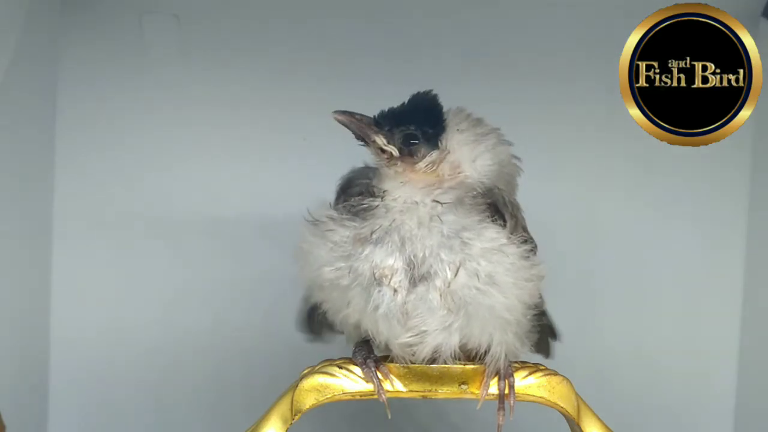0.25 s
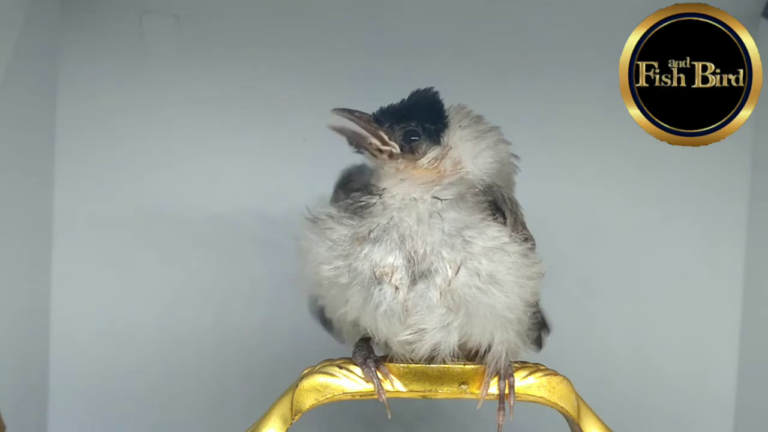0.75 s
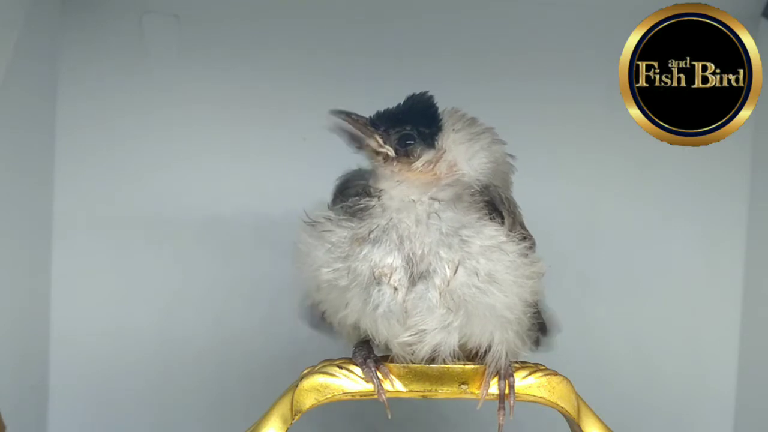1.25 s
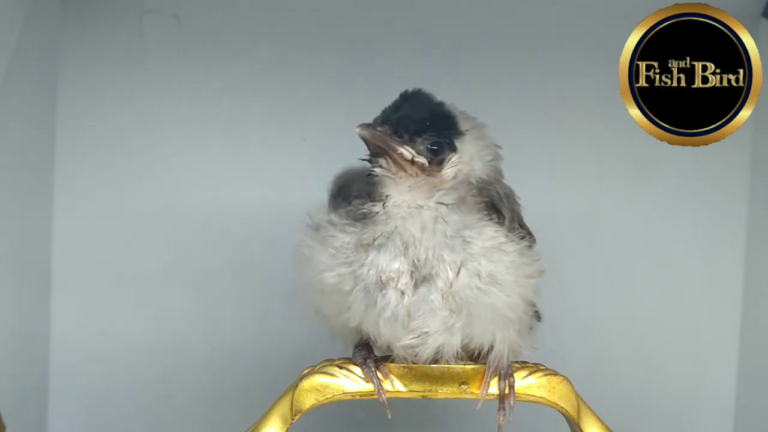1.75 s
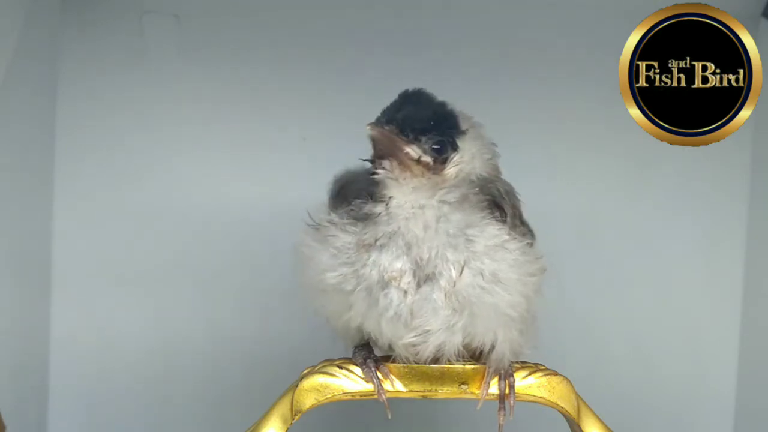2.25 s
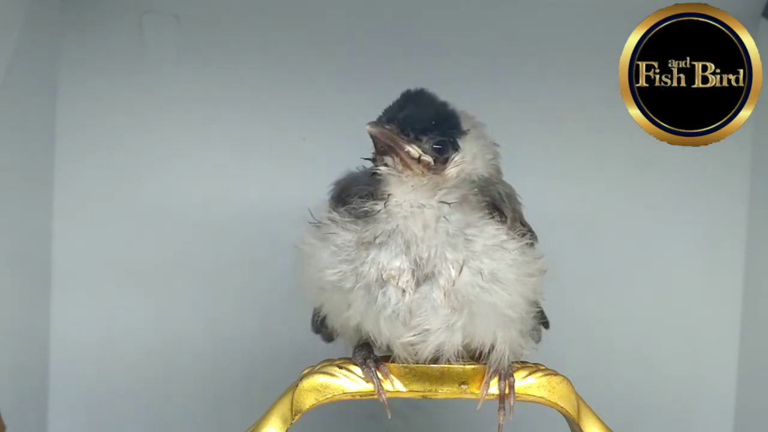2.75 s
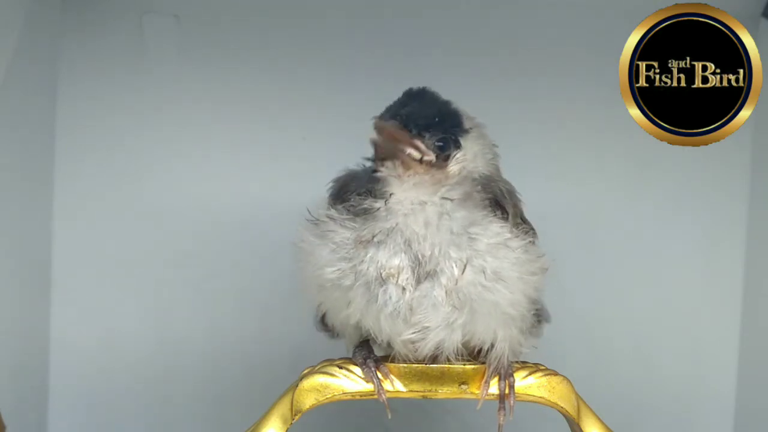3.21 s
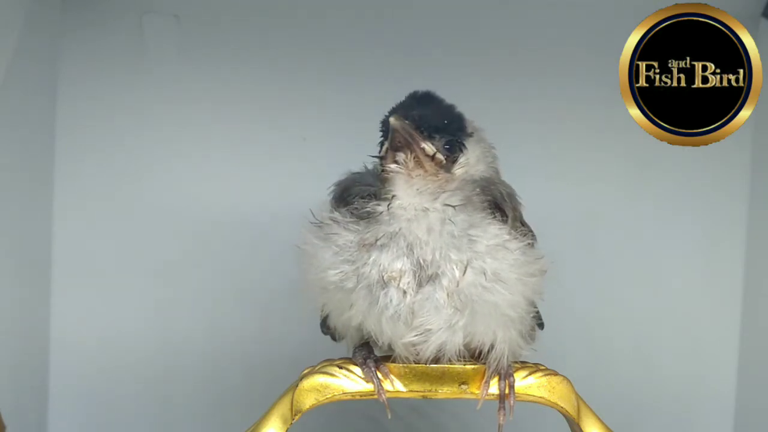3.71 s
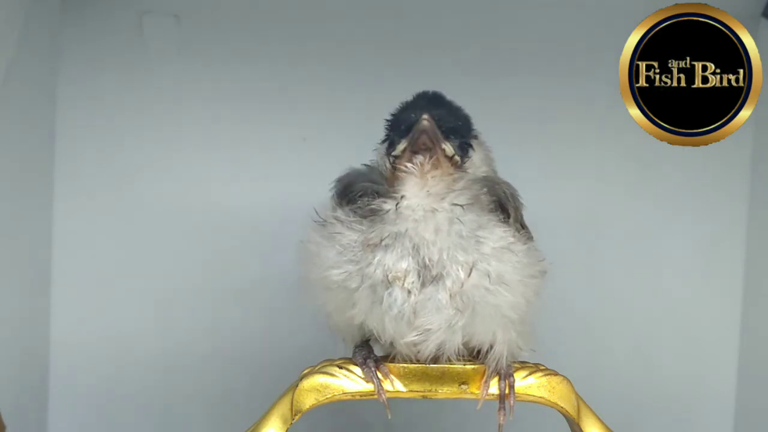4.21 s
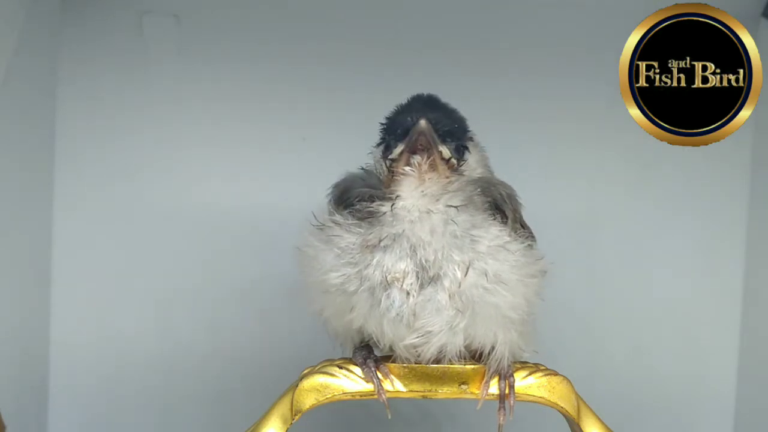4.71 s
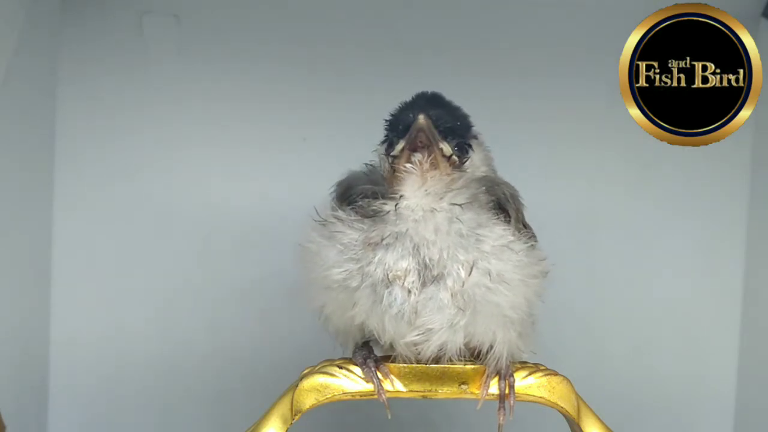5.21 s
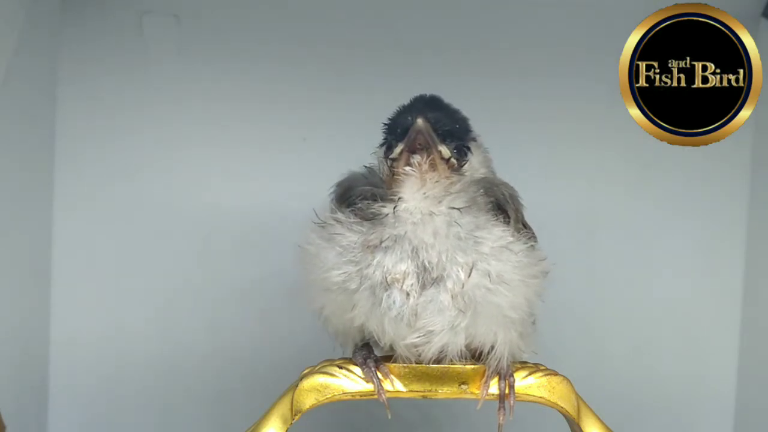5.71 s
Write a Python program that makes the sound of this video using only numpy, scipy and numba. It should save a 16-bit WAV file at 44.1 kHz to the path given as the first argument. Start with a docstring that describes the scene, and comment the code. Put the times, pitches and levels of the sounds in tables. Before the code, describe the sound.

Short, shrill chirps from a fledgling sound near the microphone, with a little room echo. Three come evenly, then the calls bunch up: a brief trilled squeak, a louder chirp and another squeak. Three slower chirps finish the series. Every call has a scratchy start, and the chirps dip slightly in pitch. The indoor background is quiet, with soft air noise, a low hum and a few very faint peeps.

```python
"""A small bare room: a fledgling begs near a stereo microphone, in seven falling chirps and two squeaks.
Each call opens with a short whistle and a rasp before the voice locks into a harmonic series.
Beak resonances filter the chirps; throat resonances filter the rough, trilled squeaks.
The room reverberates over a low hum, flickering air noise, one low whoosh and faint peeps."""
import sys
import numpy as np
from scipy import signal
from scipy.fft import rfft, irfft, next_fast_len
from scipy.io import wavfile
from scipy.ndimage import uniform_filter1d
from numba import njit

SR = 44100
rng = np.random.default_rng(int(sys.argv[2]) if len(sys.argv) > 2 else 0)


def materialize(psi):
    """Save the field psi as 16-bit PCM at rate SR to the path in sys.argv[1].

    A 1-D psi becomes a single channel; in a 2-D psi each row is a channel.
    """
    bounded = np.clip(np.atleast_2d(psi).T, -1, 1)
    quanta = np.round(bounded * 32767).astype(np.int16)
    wavfile.write(sys.argv[1], SR, quanta)


N = 262836
T = np.arange(N) / SR

# Spectrum of the room air: frequency_hz, relative_density_db
AIR_SPECTRUM = [(25, -30.5), (74, -18), (137, -28.5), (400, -34.5), (900, -32), (1560, -40.5), (2980, -42),
                (6000, -54.5), (15900, -56.5)]
# Whoosh envelope: time_s, level_db
WHOOSH_ENVELOPE = [(1.76, -71), (1.8, -48), (2.05, -49), (2.2, -61), (2.45, -67.5), (2.55, -93)]
# Whoosh bands: centre_hz, width_hz, gain_db
WHOOSH_SPECTRUM = [(366, 65, -3), (490, 200, -10), (606, 87, 2)]
# Faint peeps and swells: start_s, length_s, centre_hz, width_hz, level_db
PEEP_EVENTS = [(0.551, 0.19, 3104, 80.9, -61.5), (3.008, 0.11, 9020, 80, -66.5),
               (3.851, 0.22, 3166, 80, -64), (4.921, 0.05, 3170, 79.7, -71), (1.407, 0.22, 492, 403, -60),
               (2.68, 0.11, 867, 119, -66.5), (2.877, 0.66, 882, 198, -63.5),
               (3.44, 0.39, 1353, 101.6, -61.5), (3.508, 0.22, 897, 302, -63),
               (4.601, 0.14, 860, 400, -59.5), (4.646, 0.19, 302.6, 150, -64),
               (4.888, 0.19, 554, 99.8, -66), (5.604, 0.31, 326, 200, -77.5)]
# Reverberation by band: frequency_hz, t60_s, gain_db
ROOM_DECAY = [(1400, 0.48, -3), (3300, 0.5, 0.5), (6300, 0.44, -1.5), (9200, 0.38, 1), (14000, .33, 0)]
# Microphone port response, per head pose: frequency_hz, left_minus_right_db, left_lead_rad
PORT_RESPONSES = [
    [(1590, -5.5, 0.1), (3050, 0.5, -2.3), (3250, -6, -0.8), (3800, -8, 0.34), (4700, -11, 2.64),
     (5400, 4.5, 1.3), (5680, 1, -2.5), (6300, 2.5, -1.57), (6420, -2, 0.47), (6560, -1.0, 0.66),
     (7500, 4.5, -1), (8100, 2.5, -0.93), (9200, 3, -1.97), (9650, 3.5, -0.3), (9500, 6.5, 2),
     (10900, -5, -0.05), (13000, -4.5, 1.44)],
    [(1590, 2.5, 0.33), (3020, 2, 1.97), (3160, -4, -0.08), (3700, -6, 0.94), (4740, -9, 0.47),
     (5300, 3.0, 0.1), (6140, -8.5, -2.06), (6750, -5.0, 1.1), (6420, -2.5, 2.1), (6620, -8.5, 0.07),
     (7300, -2.5, 2), (7820, 0.5, 3.5), (8850, 6, 8.5), (9550, 7.0, 6.5), (9700, 9.0, 8.5),
     (11040, -12.5, 8.5), (13200, 2, 8)],
    [(1590, -4, -0.76), (3100, 6.5, 1.38), (3230, 4.5, 2.07), (3800, -4, -0.5), (4700, 2.5, 1.22),
     (5600, 4.5, -3.14), (6130, -15.5, 0.96), (6374, -4.5, 1.84), (6380, -7.5, -0.1), (6520, -7.5, -0.95),
     (7300, -0.5, -0.3), (7770, 1, -0.48), (9200, 14.5, -1.41), (9360, 3, 0.4), (9200, 19, 0.33),
     (11100, -10.5, -2.5), (13000, 0, -5.5)],
]
# Call openings: start_s, whistle_decay_s, whistle_db, rasp_peak_s, rasp_db
CALL_OPENINGS = [(-.008, 0.023, -21, .008, -9), (0.6946, 0.033, -22, .714, -12.5),
                 (1.288, 0.016, -26.5, 1.308, -12), (1.608, 0.0044, -18, 1.628, -17),
                 (2.167, 0.014, -22.5, 2.188, -13), (2.428, 0.006, -17.5, 2.447, -12.5),
                 (3.1965, 0.032, -20.5, 3.218, -12.5), (4.077, 0.017, -18, 4.095, -15),
                 (5.009, 0.017, -20.5, 5.03, -14.5)]
# Rasp bands: centre_hz, width_hz, gain_db
RASP_SPECTRUM = [(800, 400, -20), (2200, 1800, -19), (5216, 2800, 0.5), (6500, 3300, -9.5),
                 (10100, 2300, -6.5), (12100, 3500, -23)]
# Contour of each squeak: time_s, pitch_hz, level_db
SQUEAK_CONTOURS = [
    [(1.618, 1236, -32), (1.628, 1263, -14.5), (1.653, 1180, -7.5), (1.659, 1555, -4), (1.695, 1572, -5.5),
     (1.706, 1600, -15), (1.714, 1540, -36)],
    [(2.438, 1137, -35.5), (2.45, 1205, -26.5), (2.46, 1386, -9), (2.472, 1429, -5), (2.481, 1561, -5),
     (2.518, 1570, -7), (2.534, 1520, -27)],
]
# Trill of each squeak: start_s, build_s, swing_hz, crest_time_s, rate_hz
SQUEAK_TRILLS = [(1.653, 0.0047, 300, 1.683, 85.04), (2.461, .04, 323.2, 2.504, 85.87)]
# Effect of a full trill on partials 1 to 8: gain_db
TRILL_PARTIAL_DB = [-7, -4.5, -7, 0.5, -6, -2, -13, -10.5]
# Throat resonances: centre_hz, width_hz, gain_db
THROAT_MODES = [(3560, 1200, -4.5), (6430, 1500, -4.5), (6850, 1800, -6.5), (9670, 900, -7.5),
                (12400, 3000, -18)]
# Contour of each chirp: time_s, pitch_hz, effort_db
CHIRP_CONTOURS = [
    [(.017, 1648, 1.5), (.035, 1621, 5.5), (.055, 1626, 3), (.075, 1589, -2.5), (.092, 1528, 5),
     (.11, 1589, -1.5), (.133, 1548, 0.5), (.14, 1454, 4), (.148, 1441, -3)],
    [(.722, 1684, 3.5), (.74, 1646, 1.5), (.762, 1588, 1), (.79, 1607, 2), (.808, 1565, -3.5),
     (.82, 1502, 1), (.85, 1537, 3), (.862, 1530, 0), (.88, 1474, 0)],
    [(1.315, 1689, 0), (1.33, 1639, 1.5), (1.343, 1565, 1.5), (1.365, 1590, 0.5), (1.385, 1613, 0),
     (1.398, 1610, -1), (1.413, 1460, -5.5), (1.424, 1394, -6)],
    [(2.195, 1697, 2.5), (2.215, 1627, 10), (2.235, 1653, 4.5), (2.252, 1654, 4.5), (2.265, 1639, 5.5),
     (2.281, 1586, 0)],
    [(3.224, 1629, -0.5), (3.234, 1658, 0), (3.255, 1609, 2), (3.275, 1609, 1.5), (3.305, 1579, -0.5),
     (3.33, 1576, 0), (3.352, 1545, -1), (3.374, 1534, -1)],
    [(4.102, 1678, 1), (4.12, 1629, -1.5), (4.14, 1604, 2.5), (4.19, 1593, -2), (4.23, 1554, -3),
     (4.252, 1504, -4), (4.28, 1457, -4.5), (4.296, 1410, 3.5)],
    [(5.037, 1627, -2), (5.047, 1647, -5), (5.066, 1575, 0), (5.098, 1593, -3), (5.126, 1560, -3),
     (5.148, 1496, -6), (5.165, 1501, -1), (5.177, 1519, -4.5), (5.192, 1367, -0.5)],
]
# Partial offsets per chirp: second_db, second_tilt_db_per_100_hz, fourth_db, odd_db, above_seventh_db
CHIRP_COLOURS = [(-2.5, 9, 1, 1.5, 0.5), (-4, 4, 0, 0, -5), (0, 0.5, -2.26, 1.5, -5.5),
                 (-2.5, 1.5, -6.9, -8, -12), (1, 8, 1, 0, -8), (3.5, 0.5, 1, 0, -8), (1.5, 2, 1, 2.5, -8)]
# Beak resonances: centre_hz, width_hz, gain_db
BEAK_MODES = [(1590, 400, -30), (3048, 560, -13.5), (5220, 1300, -17.5), (6510, 2700, -10),
              (8110, 360, -10), (9414, 720, -16.5), (10724, 1000, -18), (13100, 1200, -37),
              (14300, 3700, -29)]
# Moments when the bird turns its head: time_s
POSE_CHANGES_S = [1.2, 1.55]

AIR_DB, ROOM_DB, HUM_DB, HUM_HZ = -64.5, -11.5, -61, 107
LEFT_LAG_S, PORT_TAPS = 24 / SR, 768
WHISTLE_HZ, THROAT_LOW_HZ, TILT_PIVOT_HZ = 3828, 3000, 1590
ROUGH_START, ROUGH_HELD, SETTLE_S = .5, .17, .012
LOCK_S, RELEASE_S, RELEASE_DB, ODD_DB, FLICKER_DB = .007, .022, -12.5, -12.5, 1.7
LIMIT_DB, RATIO, GRAB_S, LET_GO_S, TOP_HZ = -11, 1.9, .014, .05, 16000


def undb(db):
    """Amplitude ratio of a level in decibels."""
    return 10 ** (np.asarray(db) / 20)


def unit(x):
    """Normalisation to unit RMS."""
    return x / np.sqrt(np.mean(x ** 2))


def band(x, hz, width_hz):
    """Gaussian band-pass filter."""
    f = np.fft.rfftfreq(x.shape[-1], 1 / SR)
    return irfft(rfft(x) * np.exp(-.5 * ((f - hz) / (.5 * width_hz)) ** 2), x.shape[-1])


def walk(rate, size):
    """Smooth random fluctuation of unit RMS, changing rate times a second."""
    k = max(int(SR / rate), 1)
    return unit(uniform_filter1d(uniform_filter1d(rng.standard_normal(size), k), k))


def span(start_s, end_s):
    return slice(max(int(start_s * SR), 0), int(end_s * SR))


def phase_of(hz):
    """Phase is the time integral of frequency."""
    return 2 * np.pi * np.cumsum(hz) / SR


def resonance(hz, modes):
    """Summed gain of Lorentzian resonance peaks."""
    return sum(undb(db) / (1 + (2 * (hz - f) / width) ** 2) for f, width, db in modes)


def air():
    """Diffuse noise in third octaves, alike at both sides in the bass; bands below 2 kHz flicker."""
    table_hz, table_db = np.transpose(AIR_SPECTRUM)
    out = 0
    for hz in 30 * 2 ** np.arange(0, 9.1, 1 / 3):
        mid, side = band(rng.standard_normal((2, N)), hz, hz / 3)
        db = np.interp(np.log(hz), np.log(table_hz), table_db) + 4.5 * walk(6, N) * (hz < 2000)
        out = out + undb(db) * (mid + min(hz / 630, 1) * side * np.array([[1], [-1]]))
    return undb(AIR_DB) * unit(out)


def hum():
    """A low sinusoid under slight random amplitude and frequency modulation."""
    return undb(HUM_DB + walk(12, N)) * np.sqrt(2) * np.sin(phase_of(HUM_HZ + .76 * walk(22, N)))


def whoosh():
    """Low bands of noise swell and fade under one envelope."""
    noise = rng.standard_normal((2, N))
    rush = unit(sum(undb(db) * band(noise, hz, width) for hz, width, db in WHOOSH_SPECTRUM))
    return rush * undb(np.interp(T, *np.transpose(WHOOSH_ENVELOPE), -120, -120))


def peeps():
    """Band-limited noise: narrow high bands are heard as peeps, low ones as swells."""
    out = np.zeros((2, N))
    for start, length, hz, width, db in PEEP_EVENTS:
        at = span(start, start + length)
        size = len(T[at])
        peep = unit(band(rng.standard_normal((2, size)), hz, width))
        out[:, at] += undb(db) * np.sqrt(np.hanning(size)) * peep
    return out


def room(x):
    """Reverberation: dense echoes, different at each side, decay exponentially, the treble first."""
    t = np.arange(SR) / SR
    spectrum = rfft(rng.standard_normal((2, SR)))
    log_f = np.log(np.fft.rfftfreq(SR, 1 / SR) + 1)
    log_centres = np.log([row[0] for row in ROOM_DECAY])
    tail = 0
    for share, (_, t60, db) in zip(np.eye(len(ROOM_DECAY)), ROOM_DECAY):
        echoes = irfft(spectrum * np.interp(log_f, log_centres, share), SR)
        tail = tail + undb(db - 60 * t / t60) * echoes / np.sqrt(t60 * SR / np.log(1e6))
    tail *= np.clip((t - .003) / .005, 0, 1)  # echoes begin after 3 ms
    size = next_fast_len(N + SR)
    return undb(ROOM_DB) * irfft(rfft(x, size) * rfft(tail, size), size)[:, :N]


def ports(x):
    """Directivity: head pose sets balance and phase at the two ports; the longer left path adds delay."""
    f = np.fft.rfftfreq(PORT_TAPS, 1 / SR)
    pose = np.searchsorted(POSE_CHANGES_S, T)
    out = 0
    for k, response in enumerate(PORT_RESPONSES):
        hz, db, lead = np.transpose([(0, 0, 0), *response])  # alike in the bass
        lead = np.interp(f, hz, lead) - 2 * np.pi * f * LEFT_LAG_S
        left = undb(np.interp(f, hz, db) / 2) * np.exp(.5j * lead)
        taps = np.fft.fftshift(irfft(np.array([left, 1 / left]), PORT_TAPS), axes=1)
        taps *= np.hanning(PORT_TAPS)
        out = out + np.array([signal.fftconvolve(x * (pose == k), side, "same") for side in taps])
    return out


def openings():
    """Onset transient: a whistle slides up to its note, then the folds rasp until they lock."""
    out = np.zeros(N)
    for start, decay_s, whistle_db, peak_s, rasp_db in CALL_OPENINGS:
        at = span(start, peak_s + .01)
        t = T[at] - start
        phase = phase_of(WHISTLE_HZ * (1 - .082 * np.exp(-t / .0025) + .017 * walk(540, len(t))))
        swell = np.clip(t / .003, 0, 1) ** 2 * np.exp(-(t / decay_s) ** 2) * undb(2 * walk(350, len(t)))
        whistle = np.sin(phase) + undb(-15.5) * np.sin(2 * phase) + undb(-20.5) * np.sin(3 * phase)
        noise = rng.standard_normal(len(t))
        rasp = unit(sum(undb(db) * band(noise, hz, width) for hz, width, db in RASP_SPECTRUM))
        past_peak = T[at] - peak_s
        burst = np.exp(np.where(past_peak < 0, past_peak / .006, -past_peak / .0063))
        burst *= np.clip(t / .0049, 0, 1) ** 2
        out[at] += np.sqrt(2) * undb(whistle_db) * swell * whistle + undb(rasp_db) * burst * rasp
    return out


def squeaks():
    """Frequency modulation: a trill sweeps the partials of a rough voice across the throat resonances."""
    out = np.zeros(N)
    for contour, (start, build_s, swing_hz, crest_s, rate_hz) in zip(SQUEAK_CONTOURS, SQUEAK_TRILLS):
        times, *columns = np.transpose(contour)
        at = span(times[0], times[-1])
        t = T[at]
        hz, db = (np.interp(t, times, column) for column in columns)
        rough = ROUGH_HELD + (ROUGH_START - ROUGH_HELD) * np.exp(-((t - times[1]) / SETTLE_S) ** 2)
        swing = swing_hz * np.clip((t - start) / build_s, 0, 1)
        cycle = np.cos(2 * np.pi * rate_hz * (t - crest_s))
        hz += swing * np.arcsin(.93 * cycle) / np.arcsin(.93)  # straighter flanks than a sine
        phase = phase_of(hz * (1 + .1 * rough * walk(900, len(t))))
        trill = np.clip(swing / 250, 0, 1)
        voice = 0
        for k, trill_db in enumerate(TRILL_PARTIAL_DB, 1):
            throat = resonance(k * hz, THROAT_MODES) * np.minimum(k * hz / THROAT_LOW_HZ, 1) ** 2
            voice = voice + throat * undb(trill * trill_db) * np.sin(k * phase)
        noise = rng.standard_normal(len(t))
        hiss = unit(sum(undb(gain) * band(noise, f, 1.3 * width) for f, width, gain in THROAT_MODES))
        push = undb(2.9 * trill * cycle)  # loudest at the crests
        shimmer = 1 + rough * walk(900, len(t))
        out[at] += undb(db) * (unit(voice) * push * shimmer + 1.7 * rough * hiss)
    return out


def chirps():
    """Source and filter: harmonics of a falling pitch slide through the beak resonances.
    Successive half-periods are nearly alike, so even partials lead; odd ones flicker more."""
    out = np.zeros(N)
    for contour, (second_db, tilt, fourth_db, odd_db, top_db) in zip(CHIRP_CONTOURS, CHIRP_COLOURS):
        times, *columns = np.transpose(contour)
        at = span(times[0] - LOCK_S, times[-1])
        t = T[at]
        hz, db = (np.interp(t, times, column) for column in columns)
        waver = .0027 * walk(350, len(t)) + .00087 * walk(42, len(t))
        phase = phase_of(hz * (1 + waver))
        release = np.clip(1 - (times[-1] - t) / RELEASE_S, 0, 1) ** 2
        gate = np.clip((t - t[0]) / LOCK_S, 0, 1) * np.clip((t[-1] - t) / LOCK_S, 0, 1)
        envelope = np.sqrt(2) * gate * undb(db + RELEASE_DB * release)
        hiss = unit(band(rng.standard_normal(len(t)), hz=1400, width_hz=1300))
        out[at] += envelope * undb(-47 + 4.6 * walk(30, len(t))) * hiss
        for k in range(1, 11):
            colour_db = (k == 2) * (second_db + tilt * (hz - TILT_PIVOT_HZ) / 100)
            colour_db += (k == 4) * fourth_db + k % 2 * (ODD_DB + odd_db) + (k > 7) * top_db
            colour_db -= k * release  # upper partials fade first
            flicker_db = FLICKER_DB * (1 + k % 2) * walk(140, len(t))
            gain = resonance(k * hz, BEAK_MODES) * undb(colour_db + flicker_db)
            out[at] += envelope * gain * np.sin(k * phase)
    return out


def scene():
    """Superposition of the bird's direct sound, its reverberation and the background."""
    fade_in = np.clip(T / .0051, 0, 1)
    bird = fade_in * (chirps() + squeaks() + openings())
    return ports(bird) + room(bird) + air() + hum() + whoosh() + peeps()


@njit
def follow(x, grab, let_go):
    """Envelope detection with a fast rise and a slow fall."""
    out, level = np.empty(len(x)), 0.
    for i in range(len(x)):
        level += (x[i] - level) * (grab if x[i] > level else let_go)
        out[i] = level
    return out


def record(dry):
    """Capsule asymmetry adds a faint thump to each call; compression, soft clipping, a low-pass follow."""
    bent = dry + .028 * signal.sosfilt(signal.butter(2, 15, "high", fs=SR, output="sos"), dry ** 2)
    power = follow(np.mean(bent ** 2, axis=0), 1 / (GRAB_S * SR), 1 / (LET_GO_S * SR))
    held = bent * np.maximum(np.sqrt(power) / undb(LIMIT_DB), 1) ** (1 / RATIO - 1)
    rounded = held / (1 + np.abs(held / .97) ** 6) ** (1 / 6)
    return signal.sosfilt(signal.ellip(10, .2, 80, TOP_HZ, fs=SR, output="sos"), rounded)


dry = scene()
out = record(dry)
materialize(out)
```